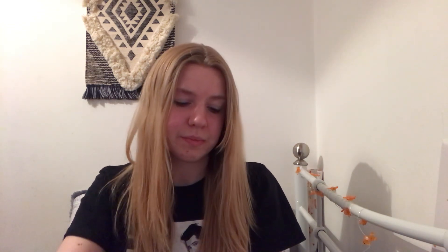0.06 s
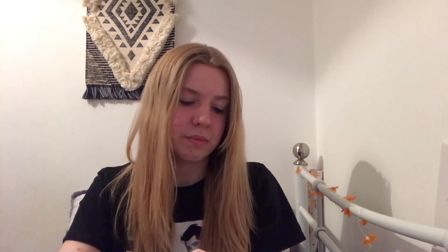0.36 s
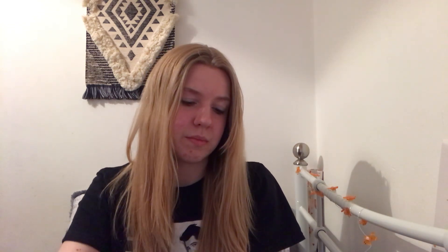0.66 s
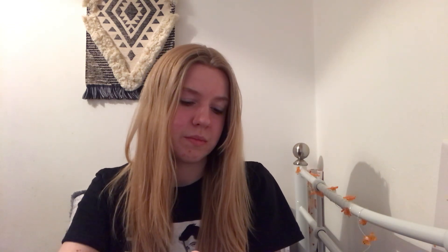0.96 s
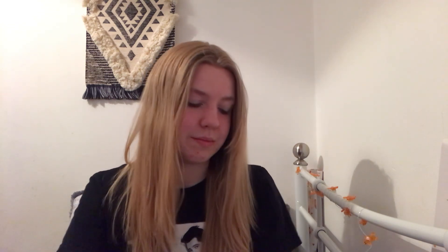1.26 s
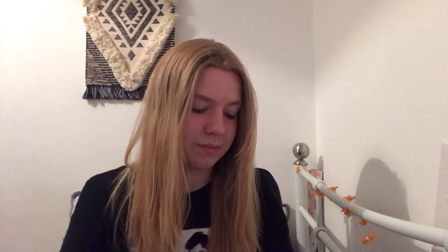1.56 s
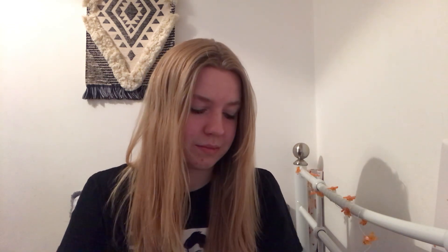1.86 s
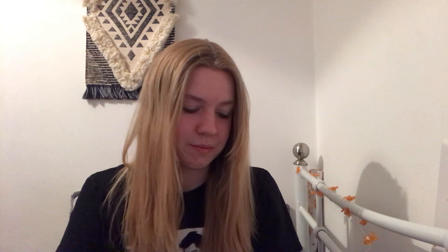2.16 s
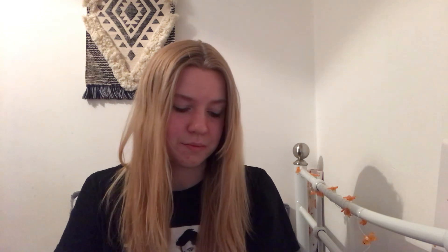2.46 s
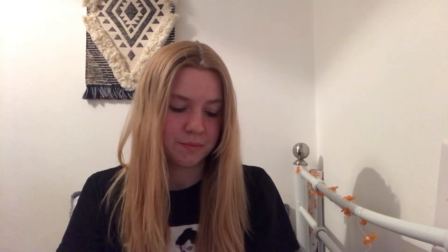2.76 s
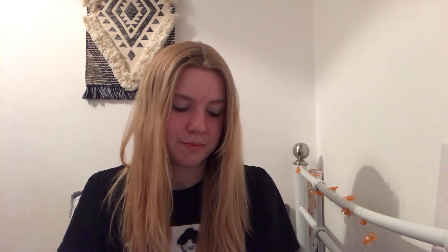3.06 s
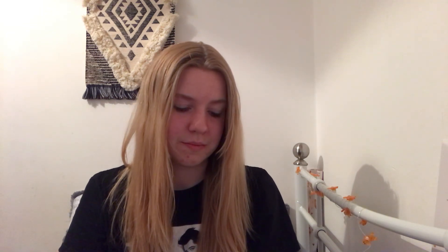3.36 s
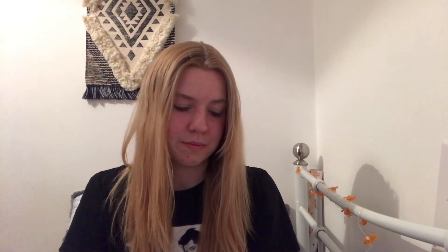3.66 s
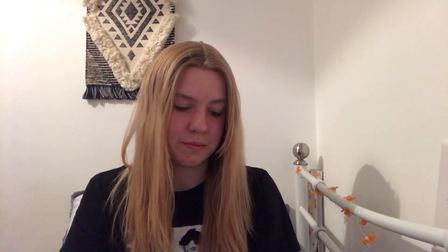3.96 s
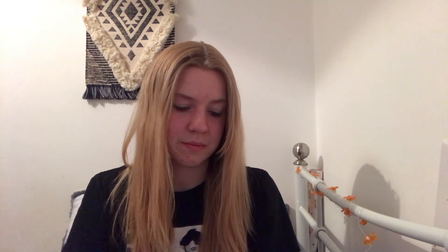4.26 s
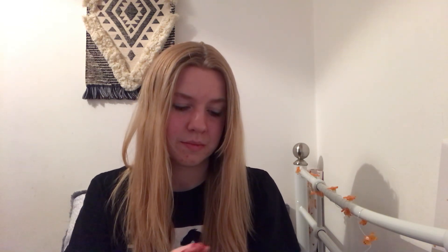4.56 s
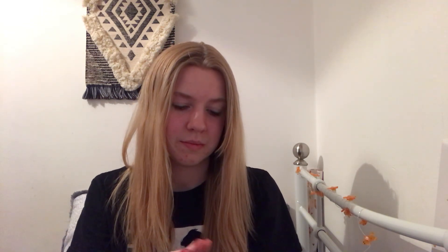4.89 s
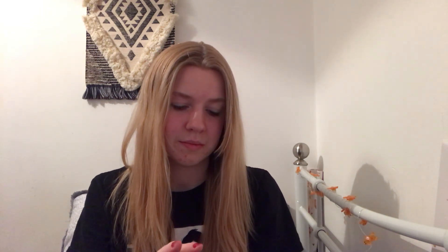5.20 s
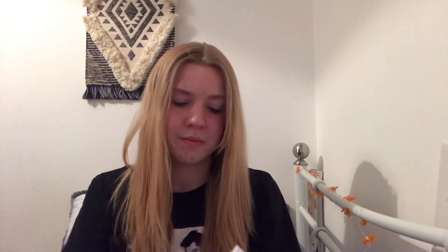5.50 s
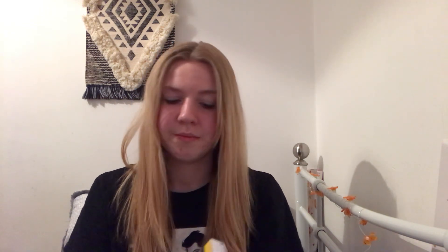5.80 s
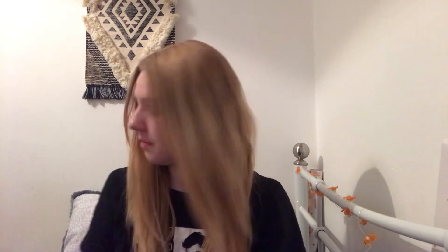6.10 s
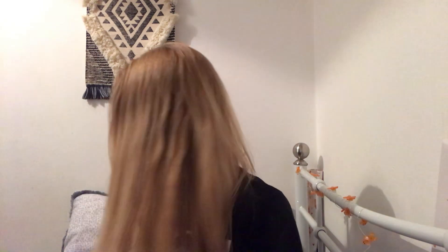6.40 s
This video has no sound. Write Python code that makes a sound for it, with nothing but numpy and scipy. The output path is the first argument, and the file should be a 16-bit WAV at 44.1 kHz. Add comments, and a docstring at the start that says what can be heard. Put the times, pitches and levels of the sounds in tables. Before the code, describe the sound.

In a small, quiet room, little boxes and plastic items are picked up and put down close by. Early on, one hits the table with a sharp clack, the loudest sound. Scattered light taps and brief cardboard scuffs follow, then card slides over card and a hollow package ticks softly several times. A last scrape and click finish the handling. Faint microphone hiss and room rumble lie underneath, with short reflections from nearby walls.

```python
"""Hands sort small cartons and plastic items on a table, close up, in a quiet bedroom.
Light taps flex damped panels and snap hard edges; one item lands hard and rings the table top.
Fingers stick and slip over card, with hollow ticks, two squeaks and a few flicks of wrapping film.
The table top and the close walls throw every tap back, over low room rumble and microphone hiss."""
import sys
import numpy as np
from scipy import signal
from scipy.fft import rfft, irfft
from scipy.io import wavfile
from scipy.ndimage import uniform_filter1d

SR = 44100
rng = np.random.default_rng(int(sys.argv[2]) if len(sys.argv) > 2 else 0)


def put_to_file(sound):
    """Save the sound as 16-bit audio at rate SR, in the file named by the first command-line argument."""
    columns = np.atleast_2d(sound).T  # one column per channel
    safe = np.clip(columns, -1, 1)
    whole_steps = np.round(safe * 32767)
    wavfile.write(sys.argv[1], SR, whole_steps.astype(np.int16))


N = 292824

# light taps of items on each other and on the table: t/s, ring level/dB, ring f/Hz, snap level/dB
LIGHT_TAPS = [(.026, -45, 1270, -56.5), (.0296, -34, 1350, -51.5), (.108, -47.5, 1470, -62),
              (.121, -38, 1420, -52.5), (.349, -57.5, 1150, -72), (.4435, -58, 2450, -77),
              (.897, -54, 299, -76), (1.132, -48.5, 870, -53), (1.146, -40, 1270, -53),
              (1.216, -38, 1120, -48), (1.926, -56.5, 1250, -54), (2.1325, -43, 1370, -45),
              (2.1351, -40, 1000, -56), (2.141, -48, 940, -43), (2.3325, -48, 2100, -64),
              (2.5035, -54, 1110, -66), (2.732, -46, 1420, -62), (2.768, -48.5, 1570, -63),
              (2.860, -52.5, 1720, -56), (2.894, -43, 1560, -59), (2.899, -41.5, 1770, -66),
              (3.085, -48.5, 1580, -50), (3.343, -52.5, 1650, -65), (3.6355, -53, 1460, -62),
              (3.840, -47, 1070, -58), (3.864, -56, 1770, -78), (3.9116, -53, 1510, -47),
              (3.937, -37, 1465, -41.5), (3.941, -36.5, 1620, -58), (4.144, -53.5, 1600, -77),
              (4.261, -62, 1370, -65.5), (4.379, -46, 1780, -64), (4.422, -50, 1440, -70),
              (4.568, -57.5, 2240, -70), (5.096, -59, 1290, -72), (5.159, -56, 1240, -57.5),
              (5.217, -67, 1180, -64), (6.0026, -48.5, 1190, -55), (6.353, -57, 1230, -80),
              (6.425, -60.5, 1790, -79), (6.608, -50.5, 1560, -47.5), (6.6285, -39.5, 720, -42)]
# finger strokes over card: t/s, length/s, body level/dB, hiss level/dB, panel f/Hz
STROKES = [(0, 0.037, -53.5, -70.5, 1210), (0.204, .07, -79, -68, 2500), (1.085, 0.15, -57.5, -71, 1170),
           (1.318, 0.13, -74, -71.5, 900), (1.422, 0.18, -64.5, -69, 1030),
           (2.044, 0.081, -71, -69.5, 1140), (2.314, 0.21, -64.5, -70, 2110),
           (2.484, .11, -63, -69.5, 1390), (2.73, 0.032, -57, -64, 1480), (2.789, 0.057, -56, -69, 1800),
           (3.039, .045, -53.5, -60.5, 1310), (3.116, 0.057, -59.5, -74, 1570),
           (3.271, 0.11, -62.5, -69.5, 1900), (3.429, 0.038, -61, -74, 1680),
           (3.611, 0.04, -51.5, -74, 1600), (3.915, 0.068, -52, -67, 1540), (3.999, 0.15, -59.5, -66, 1520),
           (4.124, 0.15, -59.5, -65, 1480), (4.357, .085, -53.5, -63.5, 1410),
           (4.44, 0.15, -60.5, -66, 1550), (5.387, 0.041, -59.5, -64.5, 2050),
           (5.556, .15, -67.5, -71, 915), (5.776, 0.29, -69.5, -75, 990), (6.31, 0.11, -67.5, -78, 1280),
           (6.511, 0.043, -52, -65, 1500), (6.595, 0.066, -48, -51.5, 2000)]
FIRM_DB = -42  # a tap listed at this ring level counts as firm


def taps(ring_db=-.5, snap_db=-1, thump_db=-13, table_db=-17, table_hz=1200):
    """Each contact flexes a damped panel, stirs the table, snaps an edge and pushes a little air."""
    out = np.zeros(N)
    for s, level_db, hz, edge_db in contacts():
        panel = struck(ring(hz, t60=.0074, rise=.00029))
        weight = min((table_hz / hz) ** 2, 1)  # small, high-pitched items hardly move the table
        table = weight * gain_of(table_db) * table_top()
        add(out, s - .0005, gain_of(level_db + ring_db) * (panel + table))
        add(out, s, gain_of(edge_db + snap_db) * edge_snap(scatter_s=.004))
        force_db = (level_db + edge_db) / 2
        thump = struck(ring(rng.uniform(182, 375), t60=.038, rise=.00049))
        add(out, s, gain_of(force_db + thump_db) * thump)
    return out


def contacts(settle_s=.003, settle_pitch=.76, settle_edge_db=-19, catch_edge_db=3.5):
    """Items meet on one edge, then settle with a duller touch; an edge also catches once per stroke."""
    rows = []
    for s, db, hz, edge_db in LIGHT_TAPS:
        rocking_db = -8 + .4 * (db - FIRM_DB)  # the firmer the tap, the more it rocks
        rows.append((s, db, hz, edge_db))
        rows.append((s + settle_s, db + rocking_db, hz * settle_pitch, edge_db + settle_edge_db))
    for (start, length, body_db, hiss_db, hz), place in zip(STROKES, rng.beta(2, 2, len(STROKES))):
        rows.append((start + place * length, body_db, hz, hiss_db + catch_edge_db))
    return rows


def hard_landing(table_db=-16, thud_db=-27):
    """An item lands in a quick run of blows that spread through the table, ring it and shake its frame."""
    # edge first, then flat: t/s, blow level/dB, snap level/dB
    blows = [(0.7403, -43.5, -78.5), (0.761, -37, -37), (.7640, -20, -31), (0.7714, -44, -43),
             (0.7807, -39, -52.5), (.7940, -36.5, -49)]
    # the item's heavily damped clack: f/Hz, level/dB
    clack_spectrum = [(25, -36), (60, -18), (150, -2.5), (340, -11), (600, -5.5), (950, -2), (1350, 1.5),
                      (1640, -12), (1950, -4), (2550, -8.5), (3000, -31.5), (3950, -19), (5000, -29.5),
                      (12000, -37)]
    out = np.zeros(N)
    clack = dispersed(struck(click(clack_spectrum)), lag_s=.00183)
    thud = ring(56, t60=.29, rise=.0029, size=16384)
    for s, db, edge_db in blows:
        add(out, s - .0006, gain_of(db) * (clack + gain_of(table_db) * table_top()))
        add(out, s - .0005, gain_of(edge_db) * edge_snap(scatter_s=.0036))
        add(out, s, gain_of(db + thud_db) * thud)
    return out


def edge_snap(scatter_s, scatter=.0943, size=4096):
    """Hard edges meet: one crack and a tight cluster of tiny ones."""
    # the crack's colour: f/Hz, level/dB
    spectrum = [(300, -26.5), (1200, 0.5), (2400, 5.5), (3300, 2), (4300, 3.5), (5100, -6.5), (6200, -4.5),
                (8000, -15.5), (10500, -15), (15000, -21)]
    cracks = scatter * rng.standard_normal(size) * np.exp(-np.arange(size) / SR / scatter_s)
    cracks[0] = .45
    return struck(signal.fftconvolve(cracks, click(spectrum))[:size])


def table_top(t60=.16):
    """The table top answers each blow, more or less in each mode depending on the spot."""
    # its modes: f/Hz, level/dB
    table_modes = [(572, -5), (667, -2.5), (770, 13), (827, -24), (949, -15.5), (1058, 11), (1140, -8),
                   (1215, -28), (1335, -7), (1405, 15)]
    modes = [(hz, db + 2 * rng.standard_normal(), t60) for hz, db in table_modes]
    return resonance(modes, detune=.0087, rise=.0025)


def dispersed(x, lag_s, hz=1000):
    """Bending waves travel slower at low pitch: the treble arrives first, hz after lag_s."""
    f = np.fft.rfftfreq(len(x), 1 / SR)
    return irfft(rfft(x) * np.exp(-4j * np.pi * lag_s * np.sqrt(f * hz)), len(x))


def card_rubs(body_db=-2, catch_db=-2, draw_db=-1, judder=.14, speed_up_share=.2):
    """Fibres catch and slip: fine grains hiss at the surface, coarser catches ring the card beneath."""
    # the card's body and its surface hiss, each: f/Hz, level/dB
    body_spectrum = [(100, -58), (300, 5), (550, -2), (750, 0.5), (1100, 0.5), (1500, 1), (2300, -1),
                     (3200, -6.5), (5000, -16), (10000, -74)]
    hiss_spectrum = [(800, -28), (2500, -14.5), (4000, 0), (5000, -3.5), (6300, 1.5), (7800, -2),
                     (9200, -0.5), (10400, -10), (12000, -1.5), (15500, -10)]
    # a long draw of card over card, brightening as it comes free: t/s, body level/dB, hiss level/dB
    long_draw = [(4.64, -83, -93), (4.692, -61, -70), (4.774, -65, -71.5), (4.858, -54.5, -68),
                 (4.874, -58, -62.5), (4.924, -64.5, -61.5), (5.0, -66.5, -96)]
    grip = np.exp(judder * wobble(N, smoothing=400))
    grains = (slips(per_s=1400, grain_db=6) + .6 * rng.standard_normal(N)) * grip
    catches = np.zeros(N)
    for hz in np.geomspace(700, 2900, num=16):  # each spot of the card has its own pitch
        catches += signal.oaconvolve(slips(per_s=40, grain_db=1.5), ring(hz, t60=.025, rise=.0005))[:N]
    card = unit_rms(coloured(grains, body_spectrum) + gain_of(catch_db) * coloured(catches, body_spectrum))
    hiss = coloured(grains, hiss_spectrum)
    out = np.zeros(N)

    def stroke(start, body_gain, hiss_gain, hz, panel_db):
        """Mixes in friction under two envelopes; the rubbed panel adds its own broad resonance."""
        at = (round(start * SR) + np.arange(len(body_gain))) % N
        panel = signal.fftconvolve(rng.permutation(grains[at]), ring(hz, t60=.013, rise=.0001))
        body = card[at] + gain_of(panel_db) * unit_rms(panel[:len(at)])
        add(out, start, gain_of(body_db) * body_gain * body + hiss_gain * hiss[at])

    for start, length, low_db, high_db, hz in STROKES + scuffs():
        speed = np.interp(np.linspace(0, 1, round(length * SR)), [0, speed_up_share, 1], [0, 1, 0])
        swell = speed ** 1.07
        stroke(start, swell * gain_of(low_db), swell * gain_of(high_db), hz, panel_db=-3)
    times, *levels = np.transpose(long_draw)
    t = np.arange(times[0], times[-1], 1 / SR)
    body_gain, hiss_gain = (gain_of(np.interp(t, times, db) + draw_db) for db in levels)
    stroke(times[0], body_gain, hiss_gain, hz=2490, panel_db=-12)
    return out


def scuffs(lead_s=.0087, length_s=.05, body_db=-62, hiss_db=-72):
    """Fingers scuff the item in a short stroke around every tap, a little more when it is firm."""
    rows = []
    for s, db, hz, _ in LIGHT_TAPS:
        push_db = .5 * (db - FIRM_DB)
        rows.append((s - lead_s, length_s, body_db + push_db, hiss_db + push_db, hz))
    return rows


def slips(per_s, grain_db):
    """Random stick-slip impulses, mostly small."""
    impulses = (rng.random(N) < per_s / SR) * rng.choice([-1, 1], N)
    return unit_rms(impulses * gain_of(grain_db * np.minimum(rng.exponential(1, N), 3)))


def hollow_ticks(variety_db=2):
    """One hollow body ticks again and again, each time in two close contacts, never quite alike."""
    # the run of dull ticks: t/s, level/dB
    ticks = [(5.57, -58.5), (5.6113, -43.5), (5.6990, -51.5), (5.7480, -53), (5.8218, -52.5),
             (5.8842, -59.5), (5.9438, -53.5), (5.9838, -54), (6.0328, -54), (6.5126, -48)]
    # the body's modes: f/Hz, level/dB, t60/s
    hollow_modes = [(675, -6, 0.051), (835, -6.5, 0.025), (1150, -4.5, 0.03), (1436, -5, 0.021),
                    (2330, 3.5, 0.0038), (3390, -4, 0.0064), (4050, -7.5, 0.008)]
    out = np.zeros(N)
    for s, tick_db in ticks:
        gap_s = rng.uniform(.001087, .004313)
        for lag_s, contact_db in ((0, -1.5), (gap_s, -5)):
            modes = [(hz, db + variety_db * rng.standard_normal(), t60) for hz, db, t60 in hollow_modes]
            add(out, s + lag_s, gain_of(tick_db + contact_db) * resonance(modes, detune=.039, rise=.00038))
    return out


def film_flicks():
    """Thin wrapping film buckles in single, very bright ticks."""
    # each buckle: t/s, level/dB
    flicks = [(4.3665, -60), (4.4254, -56), (4.435, -55)]
    # the film's colour: f/Hz, level/dB
    spectrum = [(2000, -12), (8000, -12), (13000, -1), (16000, -6)]
    out = np.zeros(N)
    for s, db in flicks:
        add(out, s, gain_of(db) * struck(click(spectrum)))
    return out


def finger_squeaks(waver=.0082):
    """Gripping skin sticks and slips fast enough to make a brief, wavering tone."""
    # each squeak: t/s, length/s, f/Hz, level/dB
    squeaks = [(0.21, 0.0092, 5250, -64.5), (0.232, 0.047, 5080, -71)]
    out = np.zeros(N)
    for s, length, hz, db in squeaks:
        progress = np.linspace(0, 1, int(length * SR))
        envelope = np.sqrt(progress) * (1 - progress) ** 2
        pitch = hz * (1 + waver * wobble(len(progress), smoothing=40))
        tone = np.sin(2 * np.pi * np.cumsum(pitch) / SR)
        add(out, s, gain_of(db) * unit_rms(envelope * tone))
    return out


def room(x, wet_db):
    """A few early reflections, then a tail that changes as the hands move about."""
    # bounces off the table top and close walls: delay/s, gain
    echoes = [(.0026, -0.058), (.0076, 0.21), (0.0123, 0.015), (0.0191, 0.051), (0.029, 0.033),
              (0.055, -0.019)]
    out = np.zeros(N)
    for delay, gain in echoes:
        add(out, delay, gain * x)
    place = 2 * np.pi * np.arange(N) / SR  # two tails crossfade in a one-second cycle
    for share in (np.cos(place), np.sin(place)):
        out += gain_of(wet_db) * signal.fftconvolve(x * share, room_tail())[:N]
    return out


def room_tail(size=SR // 2, build_s=.006):
    """A short diffuse decay of energy 1 that builds up gradually; its bass dies first."""
    # the room's decay: f/Hz, t60/s
    decay_times = [(120, 0.073), (500, 0.19), (1100, 0.19), (2500, 0.16), (6000, 0.19), (14000, 0.17)]
    hz, t, bands = signal.stft(rng.choice([-1., 1.], size), SR, nperseg=256)
    decay = np.exp(-np.log(1000) * t / curve_at(decay_times, hz)[:, None])
    tail = signal.istft(bands * decay, SR, nperseg=256)[1][:size]
    tail *= 1 - np.exp(-np.arange(size) / SR / build_s)
    return tail / np.linalg.norm(tail)


def room_tone(level_db=-66.5):
    """Steady room rumble and microphone hiss."""
    # the noise bed's colour: f/Hz, level/dB
    spectrum = [(15, -27), (25, -38), (41, -4), (64, -3.5), (99, -5.5), (144, -8.5), (200, -7),
                (449, -11.5), (905, -14.5), (1150, -14), (2150, -21.5), (5980, -26), (15800, -35)]
    return gain_of(level_db) * coloured(rng.standard_normal(N), spectrum)


def ring(hz, t60, rise, size=4096):
    """One dying mode that swells smoothly while the contact lasts; t60 and rise in seconds."""
    t = np.arange(size) / SR
    return np.sin(2 * np.pi * hz * t) * np.exp(-np.log(1000) * t / t60) * (1 - np.exp(-t / rise)) ** 2


def resonance(modes, detune, rise):
    """All modes of an object, at rms 1 where they are loudest; each blow shifts them slightly."""
    x = sum((-1) ** k * gain_of(db) * ring(hz * (1 + detune * rng.standard_normal()), t60, rise)
            for k, (hz, db, t60) in enumerate(modes))
    return x / np.sqrt(uniform_filter1d(x ** 2, size=176, mode="constant").max())


def click(spectrum, size=4096):
    """The shortest causal pulse with this spectrum."""
    log_gain = np.log(gain_of(curve_at(spectrum, abs(np.fft.fftfreq(size, 1 / SR)))))
    return np.fft.ifft(np.exp(np.conj(signal.hilbert(log_gain)))).real


def coloured(x, spectrum):
    """Filters a long signal by a spectrum, at rms 1."""
    gains = gain_of(curve_at(spectrum, np.fft.rfftfreq(len(x), 1 / SR)))
    return unit_rms(irfft(rfft(x) * gains, len(x)))


def wobble(size, smoothing):
    """Random drift at rms 1, averaged over `smoothing` samples."""
    return unit_rms(uniform_filter1d(rng.standard_normal(size), size=smoothing))


def curve_at(points, hz):
    """Reads a table on a log-frequency axis."""
    f, value = np.transpose(points)
    return np.interp(np.log(hz + 1), np.log(f + 1), value)


def gain_of(db):
    """Decibels to amplitude."""
    return 10 ** (np.asarray(db) / 20)


def unit_rms(x):
    """Scales to rms 1."""
    return x / np.sqrt(np.mean(x ** 2) + 1e-20)


def struck(x):
    """Scales a blow to rms 1 over its first 4 ms."""
    return x / np.sqrt(np.mean(x[:176] ** 2) + 1e-20)


def add(mix, s, sound):
    """Mixes a sound in at time s."""
    part = mix[max(round(s * SR), 0):][:len(sound)]
    part += sound[:len(part)]


def scene(near_send_db=-3):
    """Blows on the table spread through the room; the small sounds sit closer and drier."""
    blows = taps() + hard_landing()
    near = hollow_ticks() + card_rubs() + finger_squeaks() + film_flicks()
    reverb = room(blows + gain_of(near_send_db) * near, wet_db=-6.5)
    return (blows + near + reverb + room_tone())[None]


def record(dry):
    """A steep low-pass trims the air above 16 kHz."""
    low_pass = signal.firwin(511, 16000, window=("kaiser", 9), fs=SR)
    return signal.oaconvolve(dry, low_pass[None], "same")


dry = scene()
out = record(dry)
put_to_file(out)
```